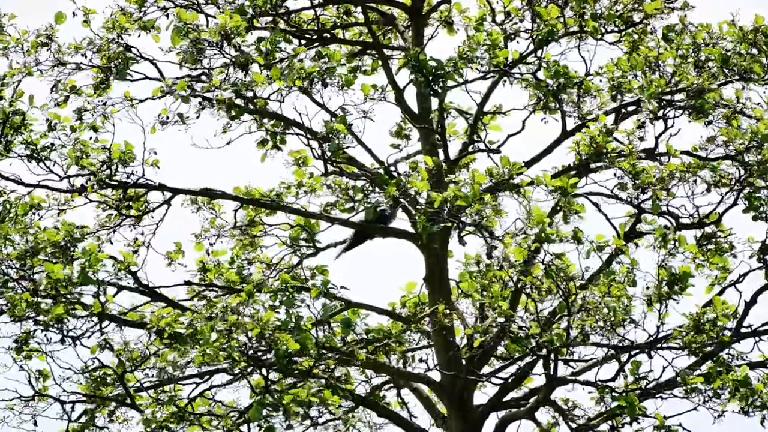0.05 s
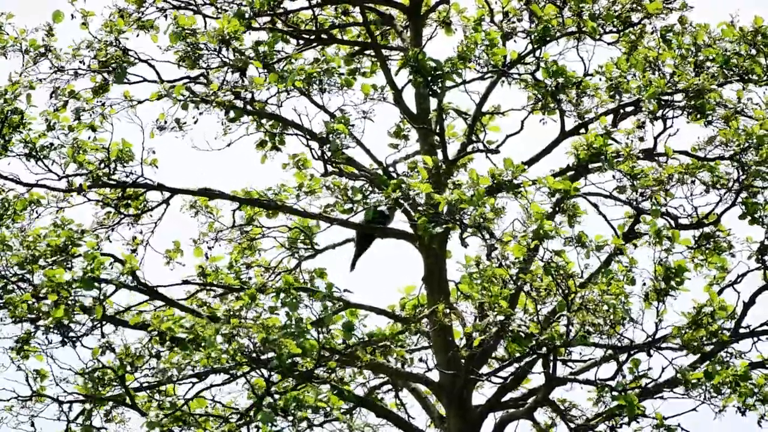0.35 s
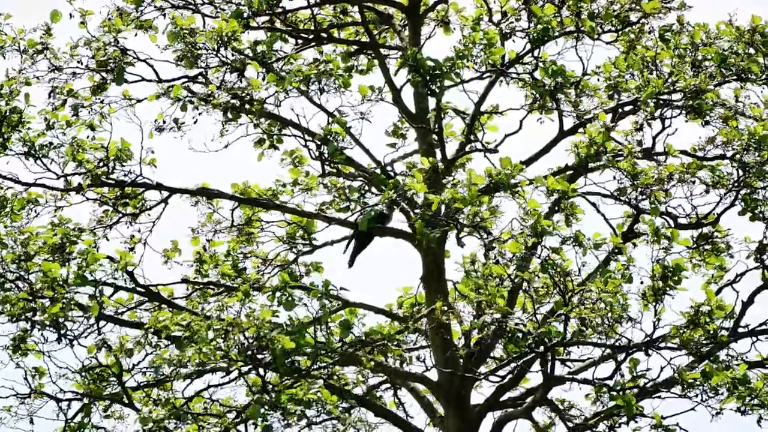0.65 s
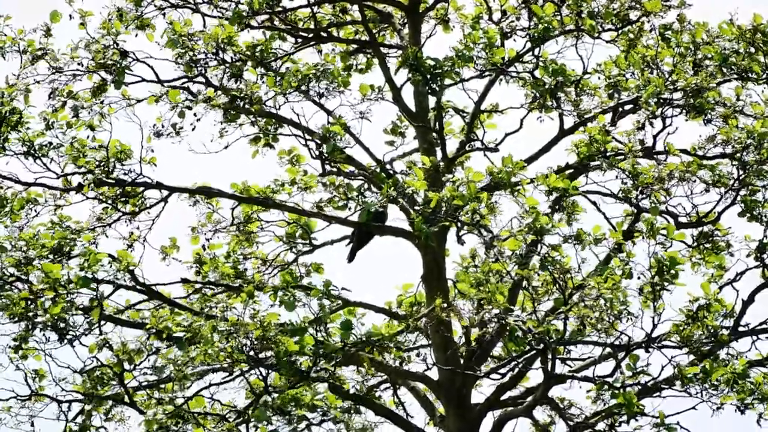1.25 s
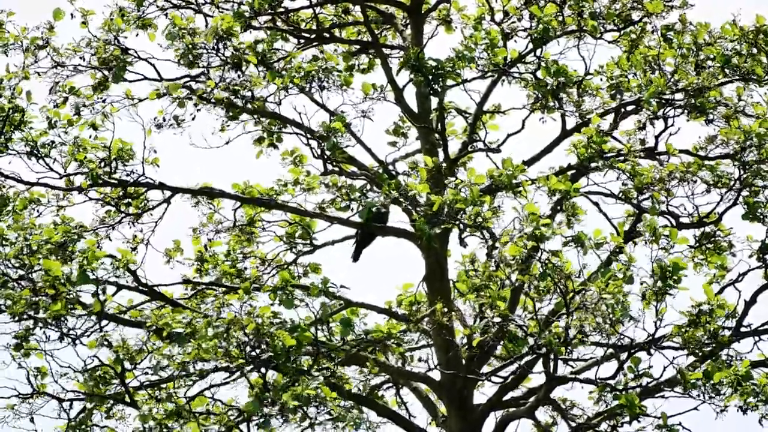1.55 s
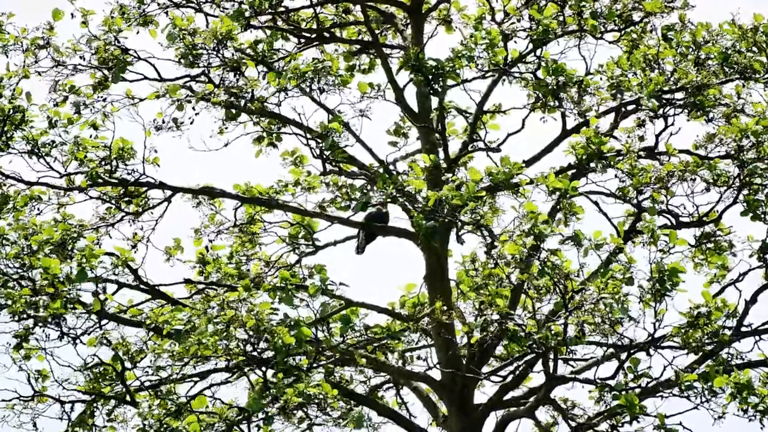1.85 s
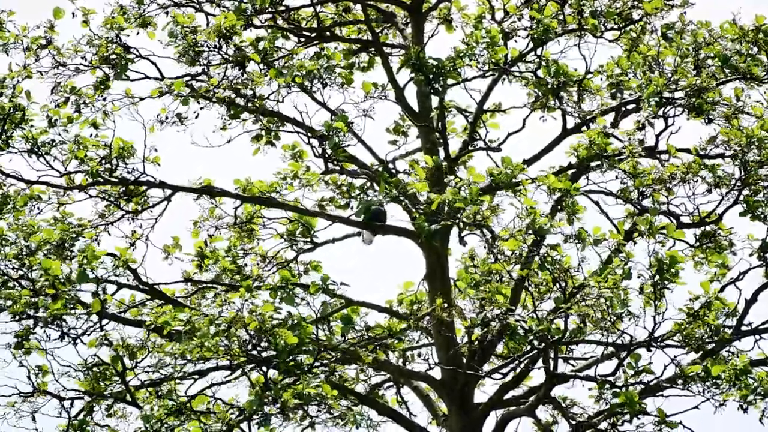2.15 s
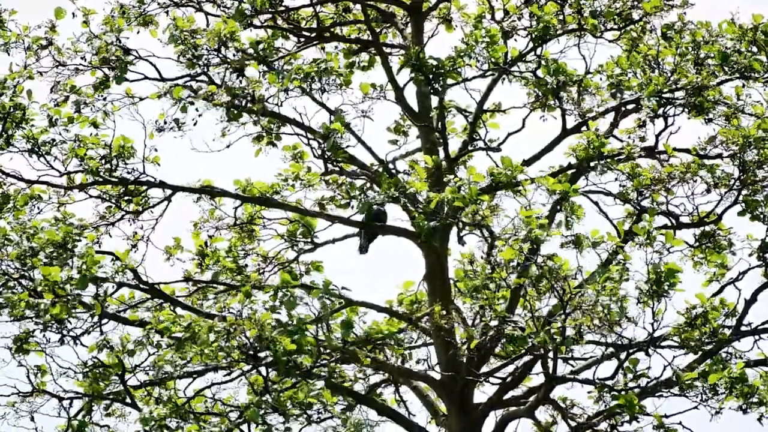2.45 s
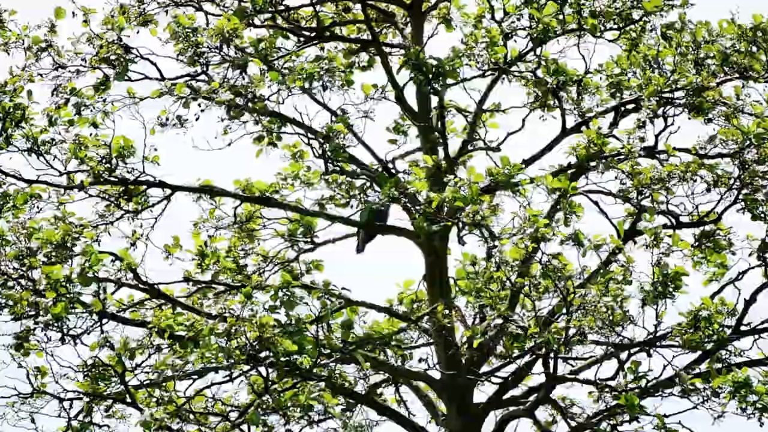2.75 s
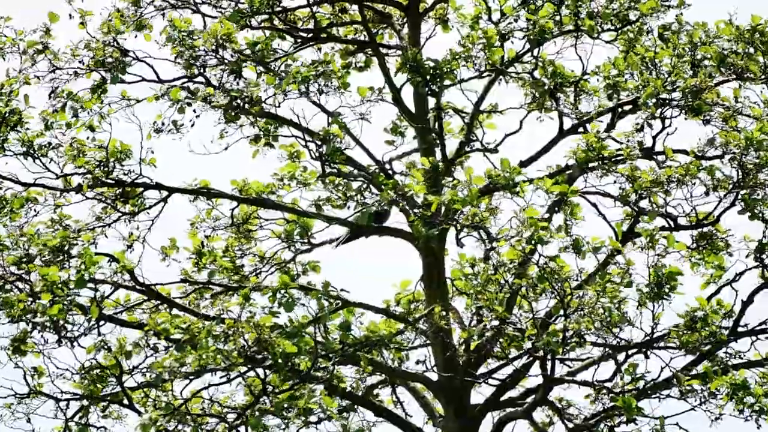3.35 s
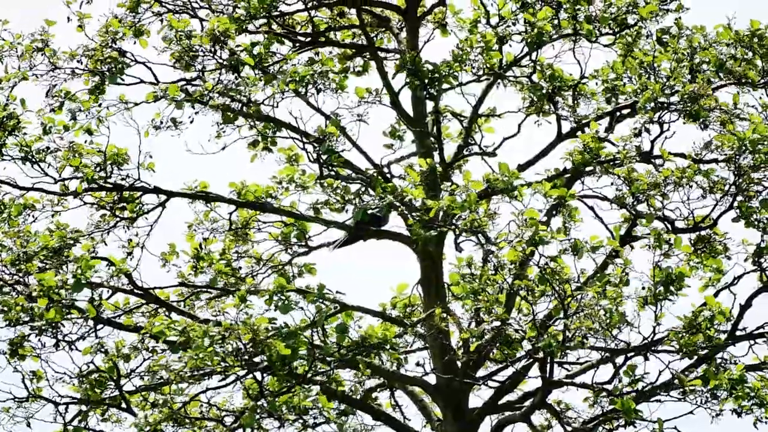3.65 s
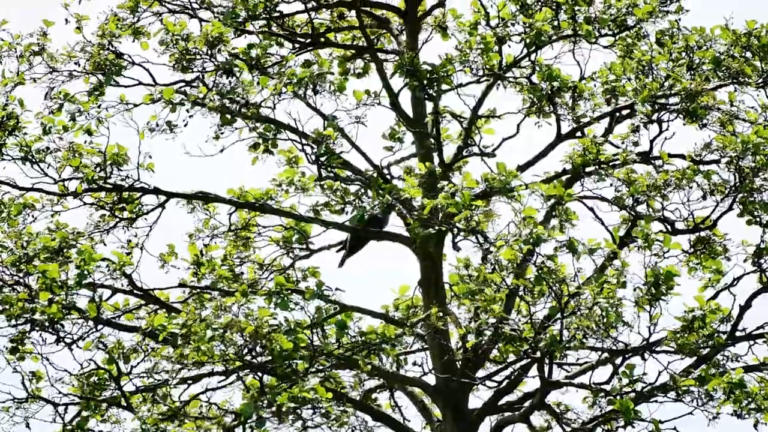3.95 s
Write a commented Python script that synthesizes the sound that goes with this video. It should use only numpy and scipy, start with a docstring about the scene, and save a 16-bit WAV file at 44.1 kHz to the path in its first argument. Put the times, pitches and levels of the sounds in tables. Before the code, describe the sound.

A cuckoo calls three times, at about 0.1, 1.8 and 3.3 seconds, each a short hollow note followed by a longer, lower one, echoing lightly among trees. A distant songbird chips faintly about three times a second throughout. From 1.7 seconds another adds thin high whistles, with six quick falling slurs between 2.2 and 3.1 seconds, then more whistles. Soft rushing air and a low distant rumble lie underneath.

```python
"""A cuckoo in the woods

A cuckoo calls three times from a tree: a short arched "cuck", then a longer, level "oo" a third lower.
Deeper in the wood one songbird chips at an even pace; another sings thin whistles and falling slurs.
Trunks and leaves scatter the notes into long tails. Behind them are faint far birds, a distant rumble
and a soft rush of air. Two microphones, set a little apart, listen."""
import sys
import numpy as np
from scipy import signal
from scipy.fft import rfft, irfft, next_fast_len
from scipy.io import wavfile
from scipy.ndimage import uniform_filter1d, map_coordinates

SR = 44100
rng = np.random.default_rng(int(sys.argv[2]) if len(sys.argv) > 2 else 0)


def master_out(mix):
    """Clip the mix to full scale and print it as 16-bit PCM to the path in sys.argv[1]."""
    frames = np.transpose(np.atleast_2d(mix))
    ceiling = np.clip(frames, -1, 1)
    pcm = np.round(ceiling * 32767).astype(np.int16)
    wavfile.write(sys.argv[1], SR, pcm)


N = 176400  # 4 seconds


def cuckoo():
    """Three "cuck-oo" calls, whose sound reaches the left microphone first."""
    # each call's first and second note (time [s], length [s], top pitch [Hz], level [dB], tail gain [dB])
    cucks = [(.096, 0.12, 685.3, -33.5, -14), (1.800, 0.11, 691, -32, -12), (3.316, 0.11, 701, -33, -12)]
    oos = [(.457, 0.22, 565.5, -32.5, -24), (2.164, 0.15, 564, -33, -18), (3.68, 0.22, 569.5, -32.5, -8.5)]
    # "cuck" arches; "oo" scoops up and holds (part of note [0-1], part of top pitch [0-1], level [dB])
    cuck_shape = [(0, .87, -20), (.24, .977, -4.5), (.58, 1, 0), (.75, .995, -.7), (1, .955, -13)]
    oo_shape = [(0, .972, -14), (.1, .996, -6.5), (.26, 1, -.3), (.76, 1, -.3), (1, .995, -14)]
    calls = hoots(cucks, cuck_shape, left_db=1.0) + hoots(oos, oo_shape, left_db=-2.0)
    return spaced(calls, lead_s=0.00009)


def hoots(notes, shape, left_db):
    """Hollow, nearly pure cuckoo notes, each with one echo off nearby trees and a faint tail."""
    overtone_db, echo_s, echo_db = -30, 0.042, -15.5
    pan = amp(np.array([[left_db], [-left_db]]) / 2)
    song = np.zeros((2, N))
    for start, length, hz, db, tail_db in notes:
        pitch, swell_db = contour(shape, length)
        pure = amp(swell_db) * note(hz * pitch, attack=0.0031, release=0.014, waver=0.0015, rate=54)
        overtone = pure ** 3 - 3 / 2 * amp(2 * swell_db) * pure  # at three times the pitch
        tone = amp(db) * (pure + amp(overtone_db) * overtone)
        add(song, start, pan * tone)
        add(song, start + echo_s, amp(echo_db) * tone)
        add(song, start, amp(tail_db) * wood(tone, build_s=0.05))
    return song


def chipping_bird():
    """A far bird chips about three times a second: a fast fall that levels out, plus a tiny flick."""
    # the chips (time [s], landing pitch [Hz], base level [dB])
    chips = [(.045, 4413, -55.5), (.366, 5290, -56), (0.687, 3735, -57), (1, 4420, -56),
             (1.339, 5300, -57.5), (1.659, 3710, -58), (1.978, 4450, -56), (2.635, 3710, -55.5),
             (2.942, 4370, -54.5), (3.275, 5220, -56), (3.604, 3770, -58), (3.922, 4420, -56.5)]
    # how a chip falls and fades (part of note [0-1], fall left [fraction], level [dB])
    chip_shape = [(0, 1, -8), (.12, .78, 3), (.3, .27, -3.5), (.55, .06, -9), (1, -.04, -2)]
    top_hz = 6990
    fall, swell_db = contour(chip_shape, length=0.06)
    flick_hz = np.linspace(6800, 5300, int(0.01756 * SR))
    song = np.zeros((2, N))
    for start, landing_hz, db in chips:
        hz = landing_hz + (top_hz - landing_hz) * fall
        chip = amp(swell_db) * note(hz, attack=0.003, release=0.012, waver=0.0258, rate=712)
        flick = amp(-3.5) * note(flick_hz, attack=0.0047, release=0.0075, waver=0.022, rate=450)
        for onset, sound in (start, chip), (start + 0.027, flick):
            add(song, onset, amp(db - 2.0) * sound)
            add(song, onset, amp(db + 9.0) * wood(sound, build_s=0.00054))
    return song


def whistling_bird():
    """Thin whistles around a run of slurs (steep downward slides), nearly drowned in their own tails."""
    # whistles that glide onto a pitch (time [s], length [s], from [Hz], to [Hz], glide time [s],
    # waver [fraction], tail level [dB], direct sound compared with the tail [dB])
    whistles = [(1.673, 0.094, 6160, 6770, 0.03, 0.032, -54, -7),
                (1.792, 0.088, 4930, 5100, 0.019, 0.016, -54.5, -6),
                (1.861, 0.071, 6930, 5380, 0.018, .014, -47, -2.5),
                (1.977, 0.12, 8720, 7530, 0.053, 0.023, -53, -12),
                (2.088, 0.067, 5050, 5113, 0.024, 0.016, -44.5, -2),
                (3.139, 0.1, 8200, 7670, 0.048, 0.025, -48.5, -7.5),
                (3.24, 0.125, 3443, 3360, 0.0695, 0.012, -51, -4),
                (3.41, 0.12, 3363, 3220, 0.048, 0.012, -54.5, -7),
                (3.533, 0.17, 7320, 6670, 0.0147, 0.0068, -44, -6.5),
                (3.803, 0.13, 5800, 5734, 0.018, 0.0086, -44, -3.5)]
    # the slurs (time [s], from [Hz], to [Hz], base level [dB])
    slurs = [(2.207, 7790, 3890, -43.5), (2.365, 7830, 3886, -42.5), (2.526, 8040, 3764, -42.5),
             (2.687, 7920, 3810, -43), (2.846, 7920, 3790, -42.5), (3.009, 7820, 3776, -43),
             (3.672, 5470, 3096, -47.5)]
    # a soft lead-in, a steep drop, a slower finish (part of note [0-1], fall left [0-1], level [dB])
    slur_shape = [(0, 0.95, -14), (.26, .89, -7.5), (.42, .72, 1), (.54, .47, -0.5), (.7, .29, -4),
                  (1, 0, -9.5)]
    # the direct sound of the slurs is dimmer at some pitches (frequency [Hz], gain [dB])
    direct_shade = [(4000, -2), (5200, -2), (6500, -11.5), (8000, -2)]
    song = np.zeros((2, N))
    for start, length, from_hz, to_hz, glide_s, waver, db, direct_db in whistles:
        hz = to_hz + (from_hz - to_hz) * np.exp(-clock(length) / glide_s)
        tone = amp(db) * note(hz, attack=0.045, release=0.045, waver=waver, rate=700)
        add(song, start, amp(direct_db) * tone)
        add(song, start, wood(tone, build_s=0.0039))
    fall, swell_db = contour(slur_shape, length=0.079)
    for start, from_hz, to_hz, db in slurs:
        hz = to_hz * (from_hz / to_hz) ** fall
        tone = amp(db + swell_db) * note(hz, attack=0.0035, release=0.0048, waver=0.0201, rate=800)
        add(song, start, amp(along(direct_shade, hz) - 3.5) * tone)
        add(song, start, amp(2.0) * wood(tone, build_s=0.0091))
    return song


def far_birds():
    """Birds so far off that only the scattered tails of their warbles are heard."""
    # faint notes (time [s], length [s], pitch [Hz], level [dB])
    far_notes = [(0.341, 0.4, 3595, -67.5), (.48, 0.039, 4350, -58), (.71, 0.065, 3800, -61),
                 (1.17, 0.23, 3175, -66.5), (1.307, 0.048, 2007, -59), (1.451, 0.046, 4380, -59.5),
                 (1.692, 0.039, 3690, -61)]
    song = np.zeros((2, N))
    for start, length, hz, db in far_notes:
        tone = note(np.full(int(length * SR), hz), attack=0.0055, release=0.027, waver=0.0405, rate=300)
        add(song, start, amp(db) * wood(tone, build_s=0.0014))
    return song


def wood(sound, build_s):
    """Trunks and leaves scatter a note into a stereo tail that builds, then dies sooner in the treble."""
    # how long the wood rings (frequency [Hz], time to fade by 60 dB [s])
    ring_times = [(500, 0.99), (3500, 0.88), (6000, 0.95), (8500, 0.66)]
    hz, t, hiss = signal.stft(rng.standard_normal((2, SR * 3 // 4)), SR, nperseg=256)
    fade = amp(-60 * t / along(ring_times, hz)[:, None]) * (1 - np.exp(-t / build_s))
    fade /= np.linalg.norm(fade, axis=1, keepdims=True)  # same energy at every frequency
    tail = signal.istft(hiss * fade, SR, nperseg=256)[1]
    return signal.fftconvolve(sound[None], tail / np.linalg.norm(tail[0]), axes=1)


def background():
    """A distant low rumble with a wavering drone in it, and a steady rush of air."""
    # tone colour of the rumble and of the air (frequency [Hz], relative level [dB])
    rumble_spectrum = [(28, -15), (58, -5.5), (74, -7), (102, -3.5), (150, -7), (200, -5.5), (300, -9),
                       (600, -29.5), (1500, -70)]
    rush_spectrum = [(60, -29), (280, -4), (450, 1), (700, 0), (950, 2.5), (1400, -5), (2200, -14.5),
                     (3300, -15.5), (5000, -18.5), (8500, -24), (15000, -26.5)]
    rumble = amp(-52) * noise(rumble_spectrum, patchy_db=1.07)
    rush = amp(-48) * noise(rush_spectrum, patchy_db=1.17)
    drone_hz = np.full(N, 102.5)
    drone_db = -60 + 0.59 * wobble(7.95, N)
    drone = amp(drone_db) * note(drone_hz, attack=0.01, release=0.01, waver=0.0588, rate=17)
    return spaced(rumble + rush + drone, lead_s=0.00014)


def noise(spectrum, patchy_db):
    """Stereo noise with the given tone colour and random louder and softer patches."""
    # the microphones hear the bass alike, the treble unrelated (frequency [Hz], likeness [0-1])
    likeness = [(100, .95), (350, .7), (700, .68), (1300, .42), (2400, .1), (3500, 0)]

    def mid_and_side(hz):
        """Split each frequency into what left and right share (mid) and what sets them apart (side)."""
        angle = np.arccos(np.clip(along(likeness, hz), -1, 1)) / 2
        return amp(along(spectrum, hz)) * [np.cos(angle), np.sin(angle)]

    hiss = signal.stft(rng.standard_normal((2, N)), nperseg=512)[2]
    patches = uniform_filter1d(rng.standard_normal(hiss.shape[1:]), 6, axis=0)  # smooth over frequency
    patches = uniform_filter1d(patches, 24, axis=1)  # and over time
    patchy_hiss = signal.istft(hiss * amp(patchy_db * unit(patches)), nperseg=512)[1][:, :N]
    mid, side = filtered(patchy_hiss, mid_and_side)
    return unit(np.array([mid + side, mid - side]))


def note(hz, attack, release, waver, rate):
    """A pure tone that fades in and out (attack, release in s); its pitch strays by the fraction waver."""
    t = np.arange(len(hz)) / SR
    fade_in = np.sin(np.pi / 2 * np.clip(t / attack, 0, 1))
    fade_out = np.sin(np.pi / 2 * np.clip((t[-1] - t) / release, 0, 1))
    unsteady_hz = hz * (1 + waver * wobble(rate, len(t)))
    return np.sqrt(2) * fade_in * fade_out * np.sin(2 * np.pi * np.cumsum(unsteady_hz) / SR)


def wobble(rate, size):
    """A smooth curve through random points, rate of them a second."""
    return map_coordinates(rng.standard_normal(4096), [np.arange(size) * rate / SR], mode="wrap")


def contour(shape, length):
    """Stretch a shape table over a note of length seconds: a pitch curve and a level curve."""
    points, *columns = np.transpose(shape)
    return [np.interp(clock(length) / length, points, column) for column in columns]


def spaced(x, lead_s):
    """The left microphone hears x earlier than the right by lead_s seconds."""
    return filtered(x, lambda hz: np.exp(1j * np.pi * hz * lead_s * np.array([[1], [-1]])))


def filtered(x, response):
    """Scale or delay each frequency of x by multiplying it by response(hz)."""
    size = next_fast_len(N + SR // 2)
    return irfft(rfft(x, size) * response(np.fft.rfftfreq(size, 1 / SR)), size)[..., :N]


def along(points, hz):
    """Read between the rows of a (frequency, value) table on a log frequency scale."""
    frequencies, values = np.transpose(points)
    return np.interp(np.log(hz + 1), np.log(frequencies + 1), values)


def add(track, start, sound):
    """Mix a sound into a track at start seconds."""
    part = track[:, max(round(start * SR), 0):][:, :sound.shape[-1]]
    part += sound[..., :part.shape[1]]


def clock(length):
    """Seconds since the start of a note."""
    return np.arange(int(length * SR)) / SR


def amp(db):
    """Turn decibels into a gain."""
    return 10 ** (np.asarray(db) / 20)


def unit(x):
    """Scale to an average strength (rms) of 1."""
    return x / np.sqrt(np.mean(x ** 2) + 1e-20)


def scene():
    """The cuckoo, two songbirds and far birds over the background."""
    return cuckoo() + chipping_bird() + whistling_bird() + far_birds() + background()


def record(dry):
    """The recorder keeps nothing above 15800 Hz."""
    return filtered(dry, lambda hz: hz < 15800)


dry = scene()
out = record(dry)
master_out(out)
```